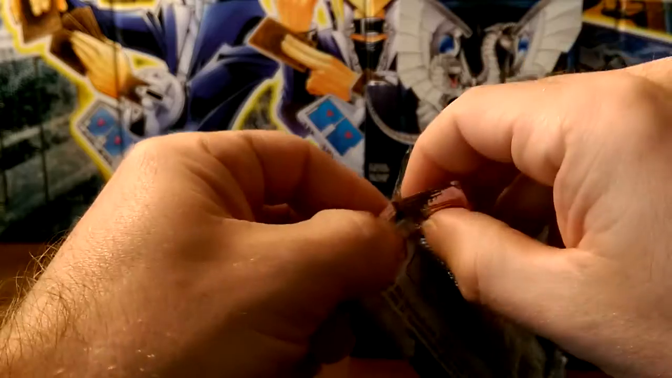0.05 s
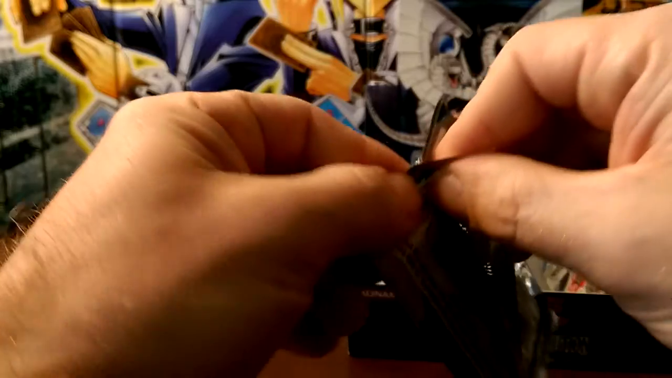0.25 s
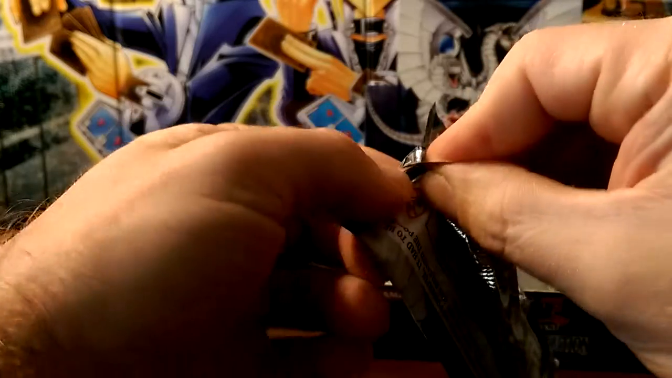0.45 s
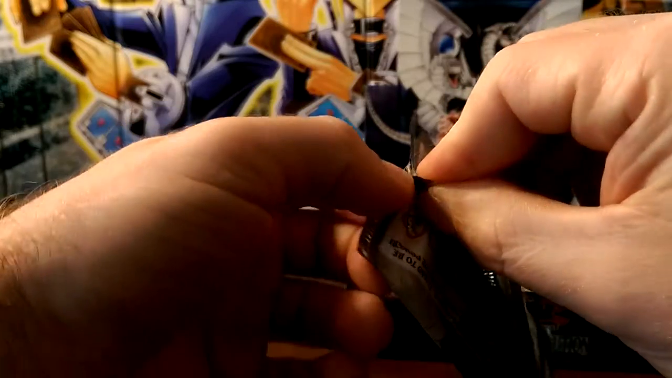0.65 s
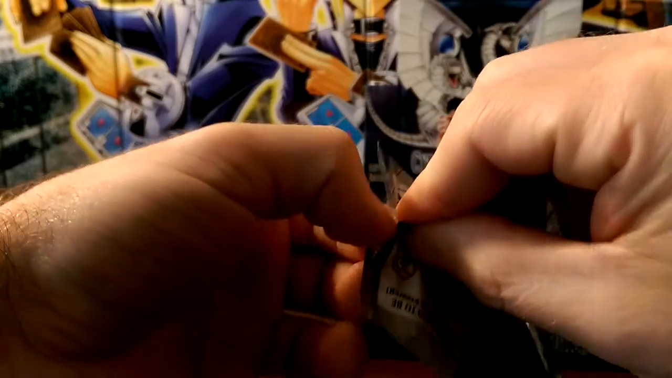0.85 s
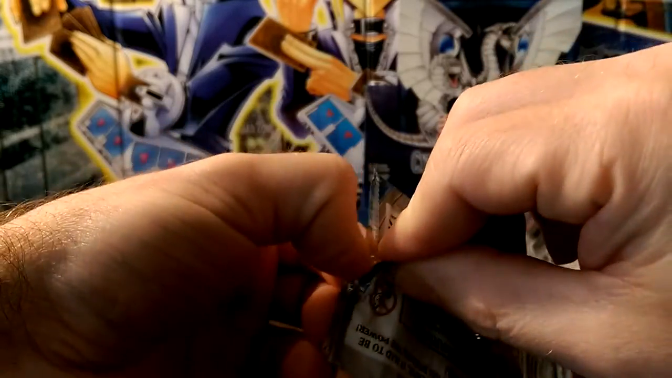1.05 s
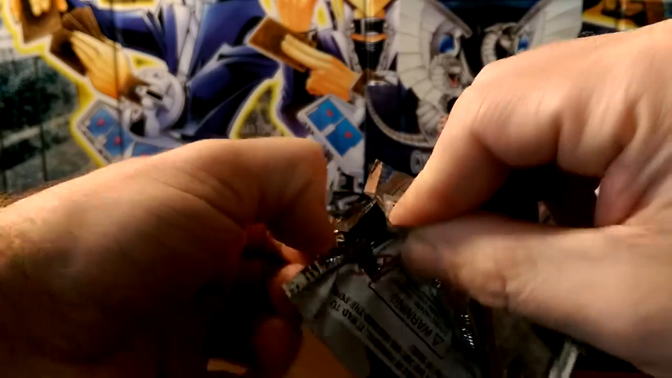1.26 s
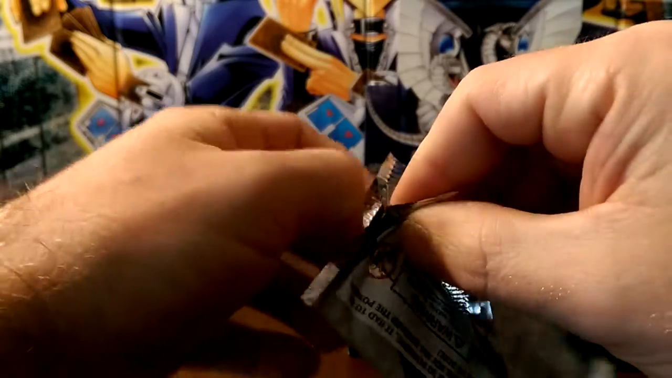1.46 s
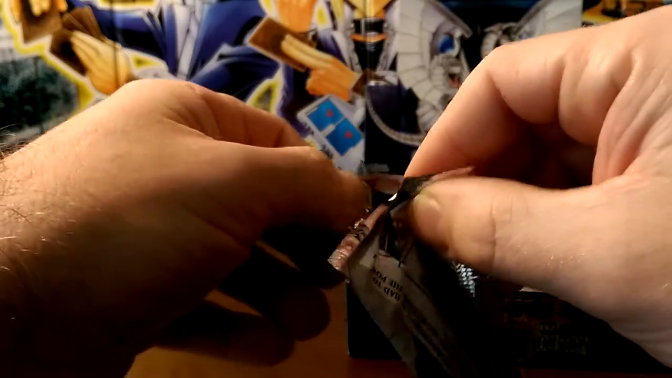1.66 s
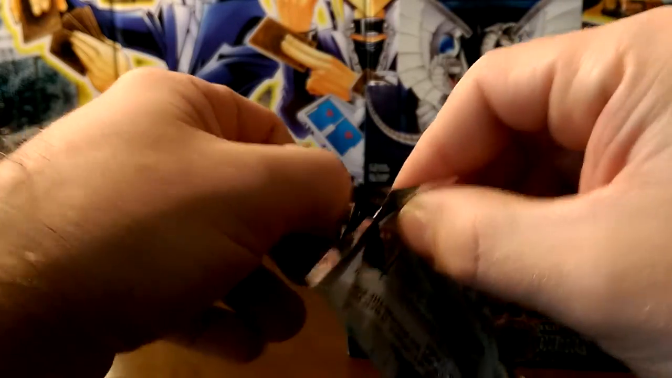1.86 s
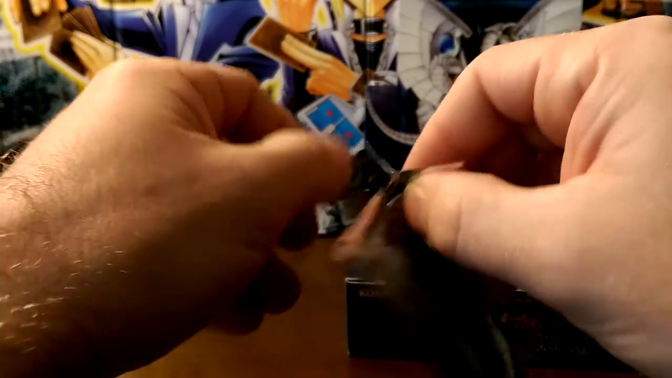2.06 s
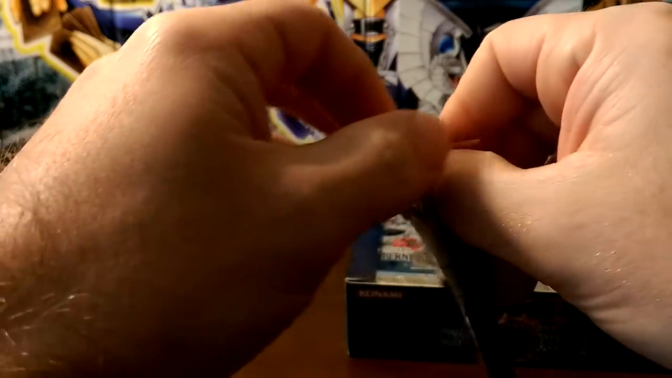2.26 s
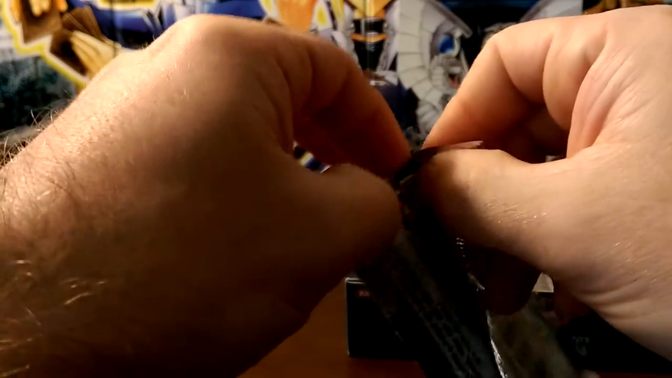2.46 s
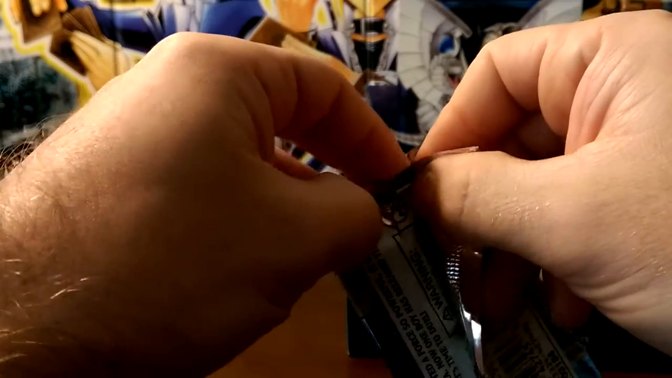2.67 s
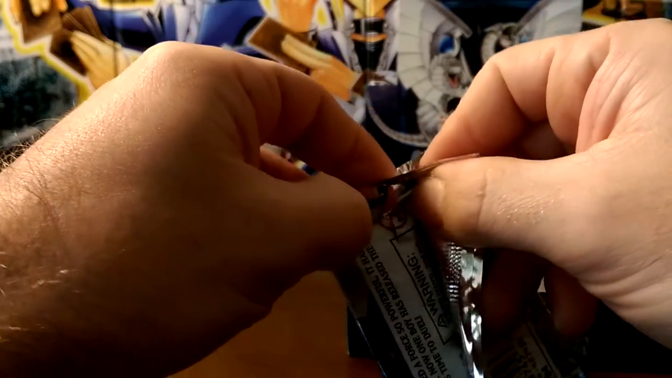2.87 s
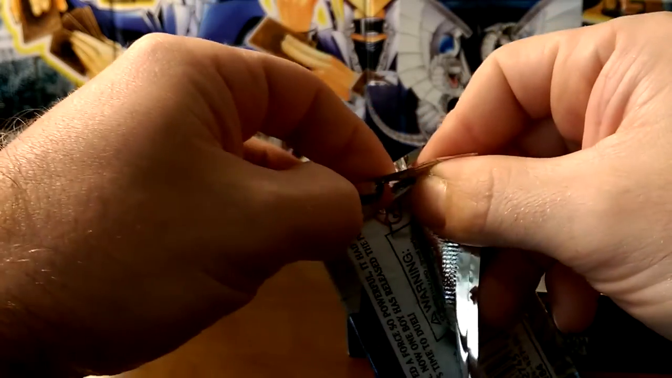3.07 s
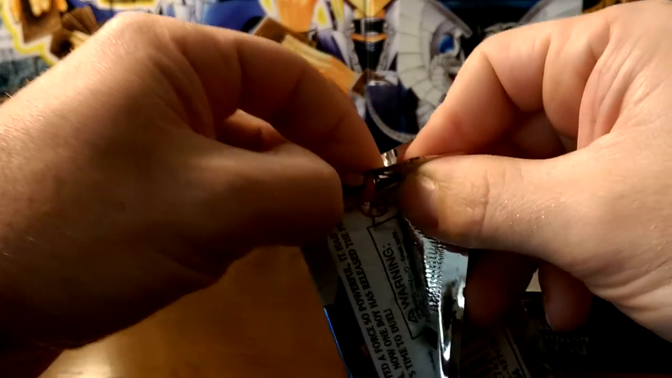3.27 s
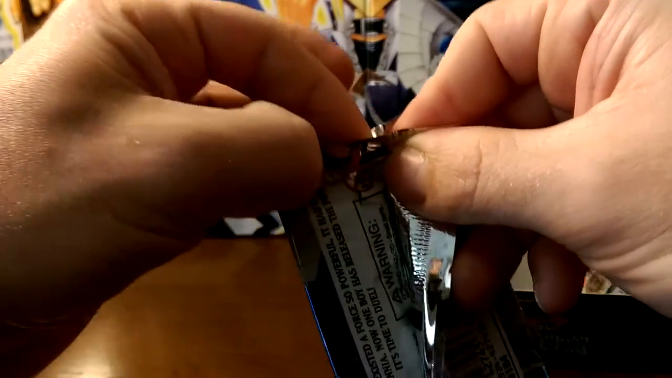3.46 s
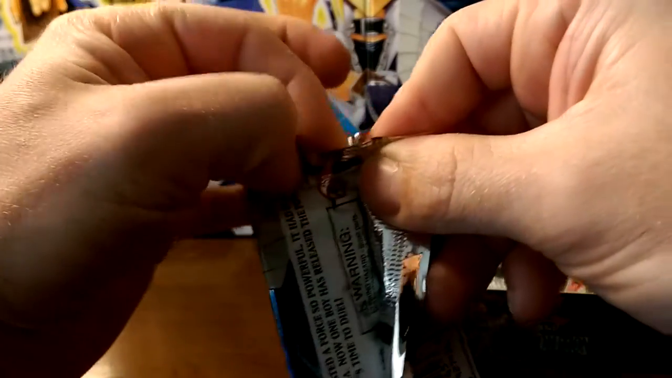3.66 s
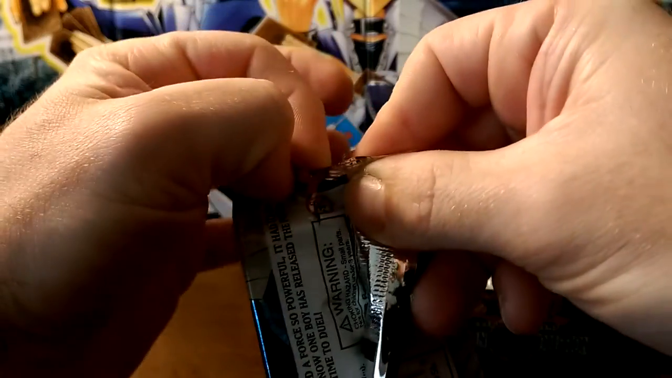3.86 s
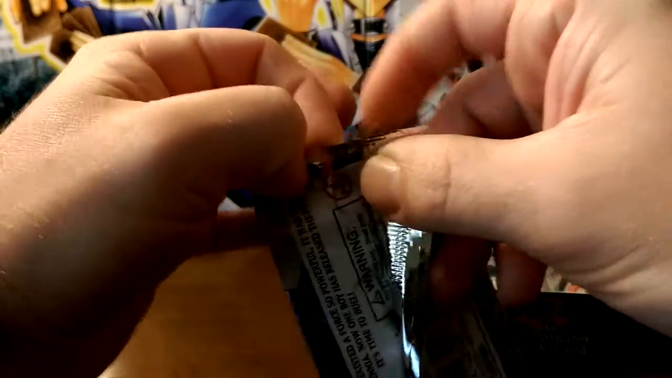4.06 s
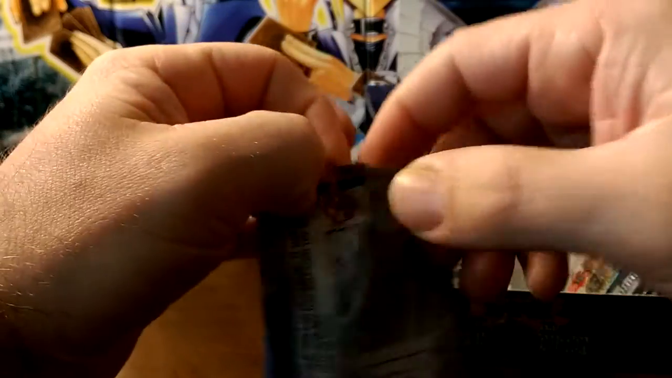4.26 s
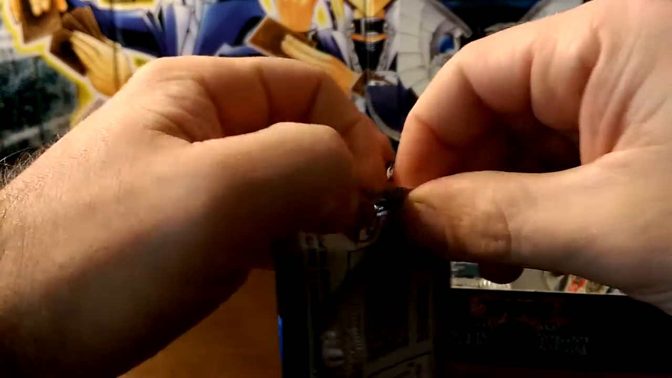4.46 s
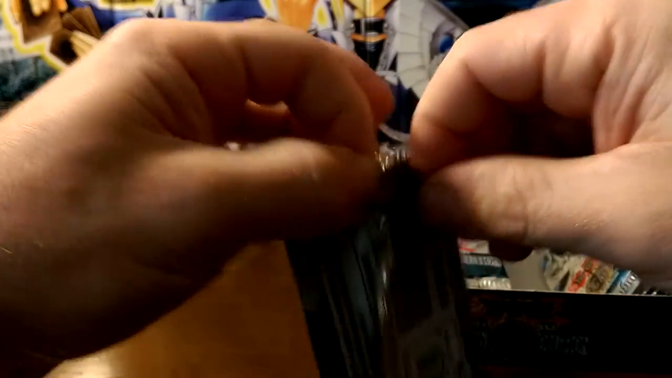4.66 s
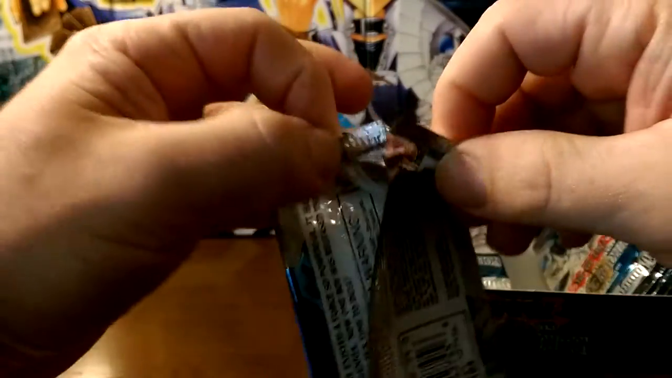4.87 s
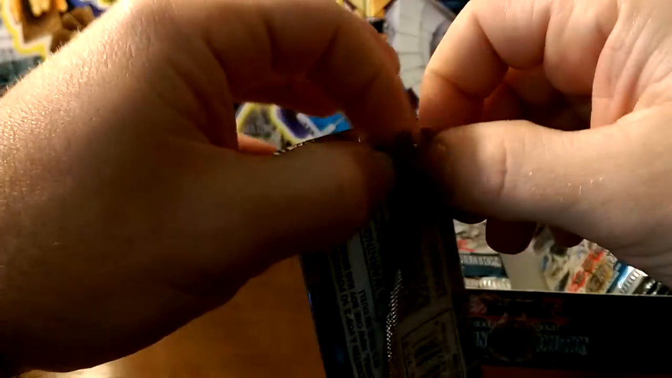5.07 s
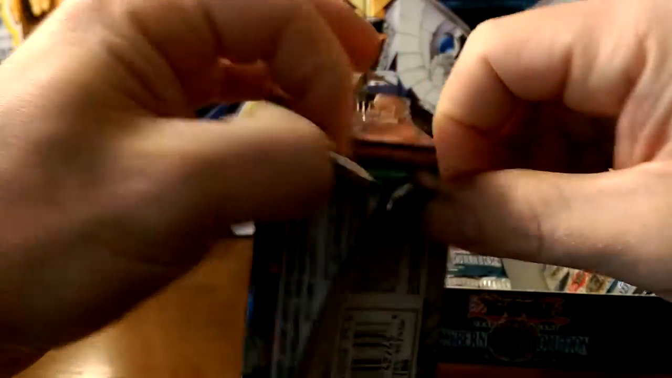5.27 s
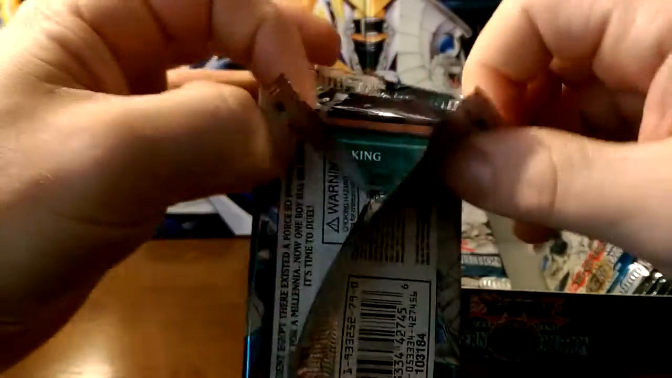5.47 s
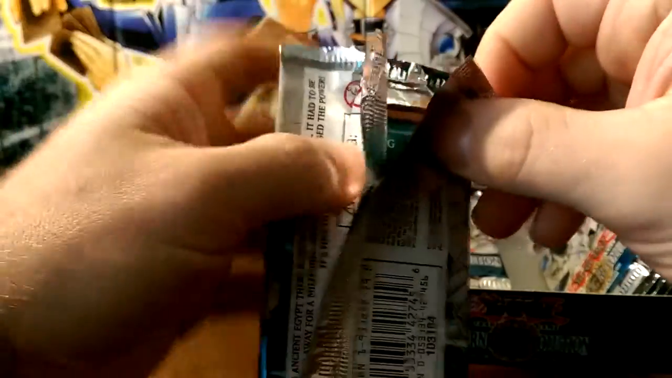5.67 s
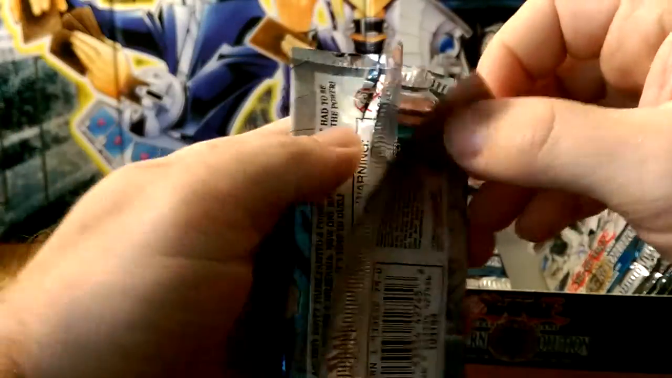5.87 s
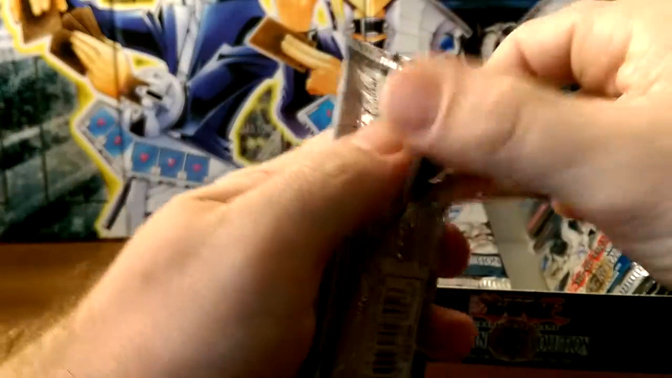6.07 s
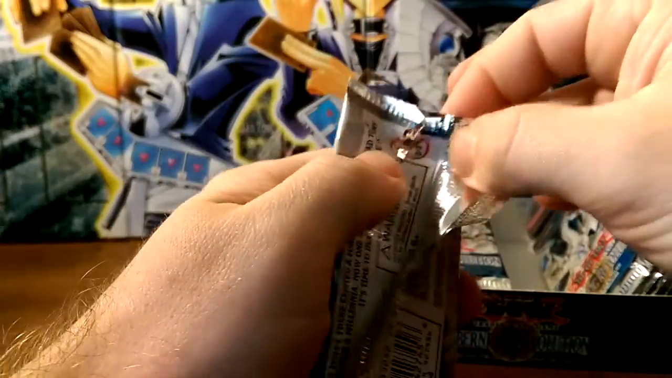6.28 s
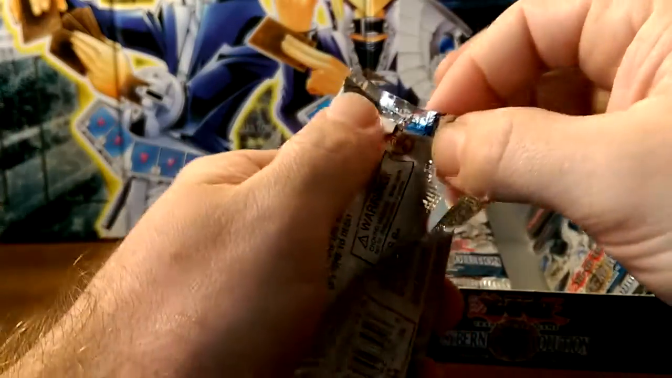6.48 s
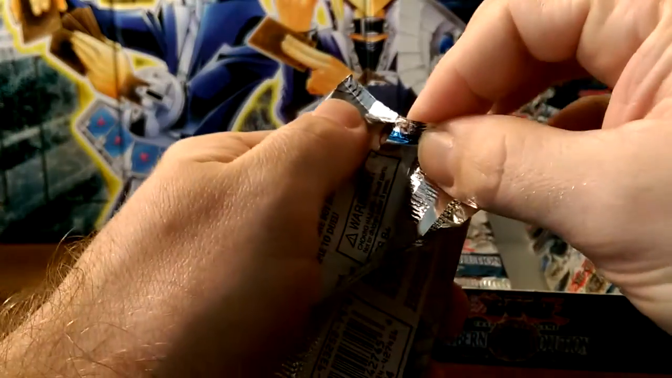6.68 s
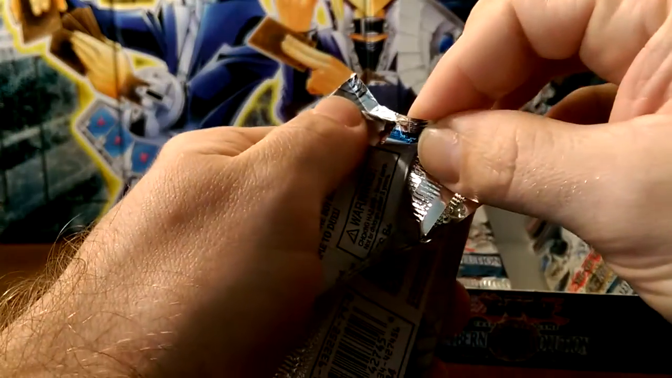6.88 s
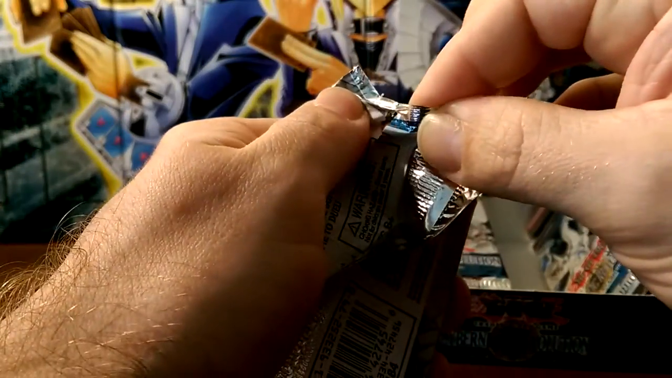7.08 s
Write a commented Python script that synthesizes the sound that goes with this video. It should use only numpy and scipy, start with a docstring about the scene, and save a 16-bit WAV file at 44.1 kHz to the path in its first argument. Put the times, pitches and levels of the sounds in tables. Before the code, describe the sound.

Close stereo pickup of a stiff foil wrapper in a quiet room, stronger on the left. Dry creases snap over fine crackling, with tiny zipping peels and soft dull thumps of handling. A dense crinkle early on fades to almost nothing, then louder irregular tearing resumes, thins out, and ends in a quick buzzing peel. Short room echo and low background drone.

```python
"""Foil wrapper pulled open

Two hands pull a foil wrapper open in a quiet room, just in front of a pair of microphones, nearer the left.
Creases buckle in sharp snaps over a finer crackle, each a short burst of noise shaped band by band.
Now and then the glued seam peels in a fast regular rattle of slips that ring a taut flap.
Hands dent the pack or bump the table as low decaying tones, over room echoes, hush, a drone and a hum."""
import sys
import numpy as np
from scipy import signal
from scipy.fft import rfft, irfft
from scipy.io import wavfile

SR = 44100
rng = np.random.default_rng(int(sys.argv[2]) if len(sys.argv) > 2 else 0)


def log_audio(samples):
    """Write samples as a 16-bit WAV file to the path given in sys.argv[1]."""
    # one column per channel
    frames = np.atleast_2d(samples).T
    # limit to full scale, then quantise
    limited = np.clip(frames, -1, 1)
    pcm = np.round(limited * 32767).astype(np.int16)
    wavfile.write(sys.argv[1], SR, pcm)


N = 314300  # samples

# Loud creases that buckle close to the microphones; levels are nominal, before band and colour offsets:
# start_s [s], level_db [dB, crack over its first 4 ms], bright_db [dB, sizzle above crack]
SNAPS = [(0.0206, -33, 5), (0.1252, -29.5, 2.5), (0.1975, -42, 3), (0.252, -31.5, -11), (0.2612, -29.5, -6),
         (0.296, -38, 4), (0.3297, -22.5, 2.5), (0.3679, -47.5, 20.5), (0.393, -42.5, 13.5),
         (0.4237, -37, 1), (0.436, -40, 13), (0.5536, -38.5, 6), (0.695, -47.5, 8.5), (0.7143, -38.5, 8),
         (0.7567, -37, 7.5), (1.0236, -40, 1), (1.0795, -45, 3), (1.0898, -40, 3.5), (1.1215, -40, 2),
         (1.1538, -44, 10), (1.2328, -38, 9), (1.2483, -41, 7), (1.273, -35, -6), (1.287, -19.5, 3),
         (1.3032, -15.5, -2.5), (1.321, -15, -2.5), (1.3367, -23.5, -6), (1.4381, -42.5, 8),
         (1.4856, -38.5, -2), (1.5772, -33, -7), (1.613, -27.5, 3.5), (1.6429, -35.5, 1),
         (1.6934, -30.5, 3), (1.7029, -26, 3), (1.7383, -33.5, 3.5), (1.76, -29, 1.5), (1.825, -26, -1),
         (1.835, -28, -6), (1.8534, -32.5, -21), (1.915, -37.5, -9), (1.9347, -22, -3), (1.9809, -28, -0.5),
         (1.986, -30, -10), (2.034, -35, -4), (2.052, -23.5, -1.5), (2.119, -32, 4), (2.127, -30, -8),
         (2.14, -34.5, -19), (2.202, -36.5, -5), (2.4166, -39.5, 3), (2.482, -34.5, -0.5),
         (2.5366, -41.5, -14.5), (2.6377, -33, 4.5), (2.8292, -45.5, -10), (2.9393, -49, -19),
         (3.041, -51, -12), (3.2612, -56, -1), (3.6071, -35, -3), (3.631, -39.5, -7), (3.8626, -36, -10.5),
         (3.979, -43.5, 7.5), (4.0095, -34.5, 0.5), (4.126, -39.5, 4.5), (4.1693, -30, -11),
         (4.2041, -36, -11.5), (4.2635, -23, -4), (4.307, -27.5, -13.5), (4.3244, -28.5, 3.5),
         (4.344, -37, 3), (4.3572, -23, -2.5), (4.4054, -28.5, -1.5), (4.4216, -30.5, -0.5),
         (4.452, -32, 2.5), (4.4686, -35, -4), (4.5854, -28.5, -1.5), (4.7156, -34, -8),
         (4.7424, -24.5, 3.5), (4.769, -30, 6.5), (4.81, -17.5, 2), (4.8264, -27.5, 7.5),
         (4.864, -30.5, 1.5), (4.886, -46.5, 12), (4.9934, -31.5, -1), (5.0024, -33, 8.5), (5.0217, -38, 0),
         (5.0284, -23, -1), (5.1179, -36.5, 0.5), (5.158, -33.5, -3), (5.1694, -23.5, -4.5),
         (5.2362, -34, -1), (5.2412, -33, 8), (5.2925, -17.5, 2.5), (5.312, -28, -5), (5.3194, -26, 0),
         (5.446, -24, 2), (5.5832, -26, 0.5), (5.756, -29, -0.5), (5.8959, -35.5, 0.5), (5.927, -28.5, -8),
         (6.0197, -32.5, -15.5), (6.266, -37.5, 0.5), (6.304, -37, 4), (6.3282, -36, 4),
         (6.6582, -31, -6.5), (6.702, -37, -17)]
SNAP_BODY_DB = -20.5  # low thud re the crack


def snaps():
    """The loud single creases, each buckling once at its own moment."""
    start_s, level_db, bright_db = np.transpose(SNAPS)
    return buckle(start_s, *crease(level_db, bright_db, SNAP_BODY_DB), colour_db=1.5)


BODY_PER_BRIGHTNESS = -0.69  # duller creases have more body (dB per dB)


def crease(level_db, bright_db, body_db):
    """Levels of body, crack and sizzle for a crease of this strength and brightness."""
    body_level_db = level_db + body_db + BODY_PER_BRIGHTNESS * bright_db
    return [body_level_db, level_db, level_db + bright_db]


# Bands of a buckle, two each for body, crack and sizzle; each ends where the next begins:
# low_hz [Hz], t60_s [s, at the left microphone], level_db [dB re its part],
# right_db [dB, right re left], direct [share of amplitude that reaches the right unscattered]
BANDS = [(270.6, 0.038, -4, -3, 0.89), (771, 0.019, 6, -4.5, 0.53), (1810, 0.011, 1, -7, 0.51),
         (4490, 0.00095, -3.5, -6, 0.17), (6430, 0.01, 1, -7.5, 0.043), (10760, 0.0027, -5, -2, 0.19)]
TOP_HZ = 14300  # upper end of the last band, and highest flap tone
RISE_S, RISE_SPREAD_DB = 0.00019, 3.5  # fastest rise; some creases give way more slowly
HEAD_GAIN, HEAD_S = 1.9, 0.00016  # the sharp first instant of a buckle
TOP_PER_BRIGHTNESS = 0.37  # the highest band follows brightness more steeply (extra dB per dB)
RIGHT_STRETCH, RIGHT_LAG = 1.8, 9  # at the right microphone: decay time factor, extra path in samples


def buckle(at_s, body_db, crack_db, sizzle_db, colour_db):
    """Each buckle shakes the sheet in a short irregular burst with a colour of its own, long in the body.
    The right microphone hears it later, weaker and smeared by the hands."""
    count = len(at_s)
    age = np.arange(450) / SR
    rise_s = RISE_S * from_db(RISE_SPREAD_DB * np.abs(rng.standard_normal((count, 1, 1))))
    shake = rng.standard_normal((count, 2, len(age)))
    shake *= 1 - np.exp(-(age + 1 / SR) / rise_s)
    shake *= 1 + HEAD_GAIN * np.exp(-age / HEAD_S)

    colour = colour_db * np.clip(rng.standard_normal((count, len(BANDS))), -2, 2)
    colour[:, -1] += TOP_PER_BRIGHTNESS * (sizzle_db - crack_db)
    first = (np.asarray(at_s) * SR).astype(int)[:, None]
    where = np.minimum(first + np.arange(len(age)), N - 1).ravel()
    edges_hz = [row[0] for row in BANDS] + [TOP_HZ]
    part_db = (body_db, crack_db, sizzle_db)
    out = np.zeros((2, N))
    for k, (low_hz, t60_s, band_db, right_db, direct) in enumerate(BANDS):
        side_t60_s = t60_s * np.array([[1], [RIGHT_STRETCH]])
        bursts = band(shake * from_db(-60 * age / side_t60_s), low_hz, edges_hz[k + 1])
        # unit level over the first 4 ms
        bursts /= np.sqrt(np.mean(bursts[:, :, :176] ** 2, axis=2, keepdims=True))
        bursts *= from_db(part_db[k // 2] + band_db + colour[:, k])[:, None, None]
        left, scattered = [np.bincount(where, bursts[:, side].ravel(), N) for side in (0, 1)]
        direct = np.clip(direct, 0, 1)
        mixed = direct * left + np.sqrt(1 - direct ** 2) * scattered
        out += [left, from_db(right_db) * later(mixed, RIGHT_LAG / SR)]
    return out


# Quick rips and crumples; levels are nominal, before the chance sizes and the cut of the whole swarm:
# start_s [s], end_s [s], level_db [dB, effort mid-stroke], bright_db [dB, sizzle above crack]
RIPS = [(0.199, 0.223, -30, 9), (0.23, 0.283, -44.5, 1), (1.252, 1.349, -29, 1.5), (1.707, 1.726, -33.5, 3),
        (1.99, 1.999, -30.5, 1), (2.269, 2.291, -50, -5), (2.9, 2.935, -64, -21.5),
        (3.833, 3.891, -50.5, -5.5), (4.126, 4.177, -45, 1.5), (4.364, 4.413, -39, 0),
        (4.47, 4.74, -51, -1.5), (4.764, 4.807, -29, -1.5), (4.94, 4.96, -42, 1.5),
        (5.253, 5.281, -35.5, -1.5), (5.33, 5.446, -29.5, -0.5), (5.612, 5.641, -42, -5),
        (6.001, 6.048, -43.5, -4), (7.074, 7.133, -36.5, 2)]
RIPS_PER_S = 1800  # nominal creases per second, before clumping
RIP_BODY_DB, RIP_EDGE_DB = -17.5, -4.5  # thud re the crack; ends of a stroke re its middle


def rips():
    """While the foil tears or crumples, creases follow almost without a gap; loudest mid-stroke."""
    levels_db, tearing = np.zeros((3, N)), np.zeros(N)
    for start_s, end_s, level_db, bright_db in RIPS:
        now, along = stroke(start_s, end_s)
        effort_db = level_db + RIP_EDGE_DB * (2 * along - 1) ** 2
        levels_db[:, now] = crease(effort_db, bright_db, RIP_BODY_DB)
        tearing[now] = 1
    creases = swarm(RIPS_PER_S * tearing, levels_db, spread_db=4.0)
    return creases * from_db(-13.5)  # each crease is smaller than their sum


def swarm(per_s, levels_db, spread_db):
    """Small creases at random, in clumps, a few much louder."""
    chance = per_s * from_db(4.5 * drift(25)) / SR
    at = np.flatnonzero(rng.random(N) < chance)
    size_db = spread_db * np.minimum(rng.exponential(1, N)[at], 3)
    return buckle(at / SR, *(np.array(levels_db)[:, at] + size_db), colour_db=4.0)


def stroke(start_s, end_s):
    """The samples of a stroke and how far along it each one is, 0 to 1."""
    now = np.arange(round(start_s * SR), min(round(end_s * SR), N))
    return now, np.linspace(0, 1, len(now))


# The glued seam lets go slip by slip; rates and levels are nominal, before unevenness and flap tones:
# start_s [s], end_s [s], first_per_s [slips/s], last_per_s [slips/s], first_db [dB], last_db [dB],
# bright_db [dB per octave], taut [pitch factor of the flap]
PEELS = [(0.461, 0.5, 330, 230, -44, -47.5, 8, 0.96), (0.606, 0.672, 317, 264, -41, -36.5, 4, 1.02),
         (5.33, 5.449, 170, 192, -24.5, -26, -1.5, 0.9), (5.522, 5.574, 95, 170, -33.5, -36, -4.5, 0.913),
         (6.836, 6.871, 210, 300, -37, -41.5, -9.5, 0.97), (6.881, 6.895, 205, 190, -42, -40, -12, 0.88),
         (6.902, 6.926, 205, 290, -34.5, -41.5, -5, 1), (6.929, 7.08, 300, 193, -35.5, -26.5, -9, 0.95),
         (7.077, 7.129, 308, 376, -35, -29.5, -9, 1.06)]
# What the flap at the seam rings with, at pitch factor 1:
# pitch_hz [Hz], width_hz [Hz], level_db [dB]
FLAP = [(1720, 280, -12), (3080, 390, 0), (4215, 570, 8), (6353, 2000, 13.5), (8870, 500, 3.5),
        (11100, 1100, 11.5), (13300, 1600, 13.5)]
PEEL_EDGE_DB = -2.5  # start and end of a stroke re its middle
SLIP_S, ROUGH_PER_DULLNESS = 0.0014, 0.1  # fray time; rough share per (dB per octave) of dullness
SLIP_BRIGHTENS = 0.16  # strokes that grow harder brighten (dB per octave per dB of growth)


def peels():
    """Stick and slip: the glue holds, then lets go at a nearly even pace; each slip rings the flap,
    higher when it is taut. Bright slips tick clean; dull ones fray in a short rough burst."""
    fray = np.exp(-1 / (SLIP_S * SR))
    uneven, left = from_db(1.9 * drift(90)), np.zeros(N + SR)
    for start_s, end_s, first_per_s, last_per_s, first_db, last_db, bright_db, taut in PEELS:
        now, along = stroke(start_s, end_s)
        per_s = (first_per_s + (last_per_s - first_per_s) * along) * uneven[now]
        turns = np.cumsum(per_s) / SR
        at = np.flatnonzero(np.diff(np.floor(turns), prepend=-1) > 0)  # a slip at each whole turn
        growth_db = (last_db - first_db) * along
        peak_db = first_db + growth_db + PEEL_EDGE_DB * (2 * along - 1) ** 2
        peak_db = peak_db + rng.standard_normal(len(now))
        rough = np.clip(-ROUGH_PER_DULLNESS * bright_db, 0, .8)
        tilt_db = bright_db + SLIP_BRIGHTENS * growth_db
        for k, (pitch_hz, width_hz, mode_db) in enumerate(FLAP):
            slip_db = peak_db + mode_db + tilt_db * np.log2(pitch_hz / 4000)
            slip_db = slip_db + 1.5 * rng.standard_normal(len(now))
            slips = np.full(len(now) + SR // 20, 1e-18)
            slips[at] = from_db(slip_db)[at]
            burst = signal.lfilter([np.sqrt(1 - fray ** 2)], [1, -fray], slips)
            burst = burst * rng.standard_normal(len(slips))
            slips = np.sqrt(1 - rough ** 2) * slips + rough * burst

            ring_hz = min(pitch_hz * taut, TOP_HZ)
            r, w = np.exp(-np.pi * width_hz / SR), 2 * np.pi * ring_hz / SR
            ring = signal.lfilter([0, np.sin(w)], [1, -2 * r * np.cos(w), r * r], slips)
            ring = band(ring, ring_hz / 1.31, ring_hz * 2.1)
            left[now[0]:now[0] + len(slips)] += (-1) ** k * ring  # neighbouring tones in opposite phase
    left = left[:N]
    # the right microphone gets a weak direct sound and four later copies
    copies = sum(0.47 * later(left, lag / SR) for lag in rng.integers(20, 110, size=4))
    right = 0.14 * later(left, RIGHT_LAG / SR) + copies
    return np.array([left, from_db(-5.0) * right])


# Pressure of the fingers on the foil, as rustle, before chance sizes and the cut of the whole swarm:
# start_s [s], level_db [dB]
HANDLING = [(0, -49), (.75, -54.5), (.98, -63.5), (1.15, -58.5), (1.5, -47.5), (2.15, -50.5), (2.3, -53.5),
            (2.7, -65.5), (3.55, -84), (4.0, -57.5), (4.24, -58), (4.35, -48.5), (5.0, -54), (5.6, -50.5),
            (5.86, -60.5), (6.6, -52.5), (6.8, -68)]
# Brightness of the rustle, highest while the thin flap is worked:
# start_s [s], bright_db [dB, sizzle above crack]
RUSTLE_BRIGHTNESS = [(0, 4), (1.2, 3.5), (2.4, -1.5), (7.1, -1.5)]
CRACKLES_PER_S = 320  # nominal, before clumping
CRACKLE_SPREAD_DB, CRACKLE_BODY_DB = 4, -11  # spread of sizes; thud re the crack


def crackle():
    """The foil ticks faintly wherever fingers press it, in a sparse swarm of small creases."""
    level_db, = in_time(HANDLING)
    bright_db, = in_time(RUSTLE_BRIGHTNESS)
    levels_db = crease(level_db, bright_db, CRACKLE_BODY_DB)
    creases = swarm(CRACKLES_PER_S, levels_db, CRACKLE_SPREAD_DB)
    return creases * from_db(-10.0)  # each crease is smaller than their sum


# Fingers dent the pack, hands meet the table; levels are before the soft onset and left-right balance:
# start_s [s], level_db [dB], pitch_hz [Hz]
BUMPS = [(0.2596, -26, 780), (0.27, -30, 740), (0.81, -41, 815), (1.739, -37.5, 327.7), (1.834, -26, 630),
         (1.982, -28.5, 890), (2.126, -35, 449), (2.5012, -30.5, 990), (2.528, -42, 255),
         (3.827, -42.5, 340.4), (4.398, -38.5, 125.1), (4.46, -38.5, 124), (4.668, -44, 398.6),
         (4.805, -27.5, 489), (5.027, -30.5, 350), (5.333, -34, 370), (5.992, -31, 526),
         (7.077, -40.5, 280)]
BUMP_CYCLES = 6.4  # cycles to die by 60 dB


def bumps():
    """The pack or the table top answers a soft push with a short low ring."""
    out = np.zeros(N)
    for start_s, level_db, pitch_hz in BUMPS:
        age = np.maximum(np.arange(N) / SR - start_s, 0)
        decay = from_db(level_db - 60 * age * pitch_hz / BUMP_CYCLES)
        onset = 1 - np.exp(-age * pitch_hz * 4.6)
        out += decay * np.sin(2 * np.pi * pitch_hz * age) * onset
    return out * from_db([[1.5], [-1.5]])


ROOM_T60_S, ROOM_DB, FIRST_WALL_S = 0.28, -14, 0.0061
WALL_CUT_HZ = 8500  # upper edge of the slower-dying band


def room(x):
    """Diffuse echoes from the first wall on, the treble dying sooner; own ones for each microphone."""
    age = np.arange(SR // 2) / SR
    noise = rng.standard_normal((2, len(age)))
    dull = band(noise, 200, WALL_CUT_HZ)
    tail = dull * from_db(-60 * age / ROOM_T60_S)
    tail = tail + (noise - dull) * from_db(-60 * age / (0.95 * ROOM_T60_S))
    tail = tail * (age > FIRST_WALL_S)
    tail = tail / np.sqrt(np.mean(np.sum(tail ** 2, axis=1)))
    return signal.fftconvolve(x[None], tail, axes=1)[:, :N]


# Spectrum shape of the hush at the microphones:
# pitch_hz [Hz], level_db [dB per Hz, relative]
ROOM_TONE = [(20, -6.5), (42, -9), (60, -2.5), (226, -10), (305, -14), (600, -17), (12100, -32),
             (16000, -39.5)]
ROOM_TONE_DB = -66  # overall, before left-right balance


def room_tone():
    """Steady hush of the room and the microphones, shaped noise partly alike in both in the bass."""
    pitch_hz, level_db = np.transpose(ROOM_TONE)
    grid_hz = np.maximum(np.arange(N // 2 + 1) * SR / N, 1)
    shared, left, right = rfft(rng.standard_normal((3, N)))
    alike = .7 / (1 + (grid_hz / 500) ** 2)  # shared part of the power
    both = np.sqrt(alike) * shared + np.sqrt(1 - alike) * np.array([left, right])
    shape = from_db(np.interp(np.log(grid_hz), np.log(pitch_hz), level_db))
    return from_db(ROOM_TONE_DB) * rms_one(irfft(both * shape, N))


RUMBLE_DB = -74  # middle level, before left-right balance


def rumble():
    """A low drone from outside, narrow noise that swells and fades."""
    shared, left, right = band(rng.standard_normal((3, N)), 98.0, 150)
    swell = from_db(RUMBLE_DB + 1.3 * drift(0.91))
    return swell * rms_one(shared + .5 * np.array([left, right]))


# A low hum comes and goes; levels are before left-right balance:
# start_s [s], level_db [dB]
HUM = [(.6, -83), (.9, -71), (1.6, -70), (2.4, -74), (2.7, -84), (5.9, -78), (6.2, -69), (6.6, -87)]
HUM_HZ = 97.9


def hum():
    """A wavering bass tone: noise in a band of a few Hz."""
    level_db, = in_time(HUM)
    return from_db(level_db) * rms_one(band(rng.standard_normal(N), HUM_HZ - 3, HUM_HZ + 3))


def from_db(db):
    """Amplitude factor of a level in dB."""
    return 10 ** (np.asarray(db) / 20)


def rms_one(x):
    """Scale to an overall RMS of 1."""
    return x / np.sqrt(np.mean(x ** 2) + 1e-20)


def in_time(rows):
    """Columns of a table drawn as straight lines over its first column, start_s."""
    start_s, *columns = np.transpose(rows)
    return [np.interp(np.arange(N) / SR, start_s, column) for column in columns]


def band(x, low_hz, high_hz):
    """Keep what lies between two frequencies."""
    edges_hz = [low_hz, min(high_hz, SR / 2.2)]
    return signal.sosfilt(signal.butter(2, edges_hz, "band", fs=SR, output="sos"), x + 1e-18)


def drift(rate_hz):
    """Slow chance, spread 1: smoothed noise made every 40 samples."""
    r = np.exp(-80 * np.pi * rate_hz / SR)
    noise = rng.standard_normal(N // 40 + 2002)
    slow = signal.lfilter([1], [1, -2 * r, r * r], noise)[2000:]  # skip the filter's start
    return np.interp(np.arange(N) / 40, np.arange(len(slow)), rms_one(slow))


def later(x, delay_s):
    """Delay a signal by the time its extra path takes."""
    return np.interp(np.arange(N) - delay_s * SR, np.arange(N), x, left=0)


def scene():
    """The foil in front, its echoes and bumps, and the quiet background slightly stronger on the left."""
    foil = snaps() + crackle() + rips() + peels()
    echoes = from_db(ROOM_DB) * room(foil[0])  # fed by the left microphone's foil
    quiet = (room_tone() + rumble() + hum()) * from_db([[1.5], [-1.5]])
    return foil + echoes + bumps() + quiet


CUTOFF_HZ = 16500


def record(dry):
    """The loudest peaks are rounded, then the top is cut."""
    rounded = .9 * np.tanh(dry / .9)
    return signal.sosfilt(signal.cheby2(14, 80, CUTOFF_HZ, fs=SR, output="sos"), rounded)


dry = scene()
out = record(dry)
log_audio(out)
```